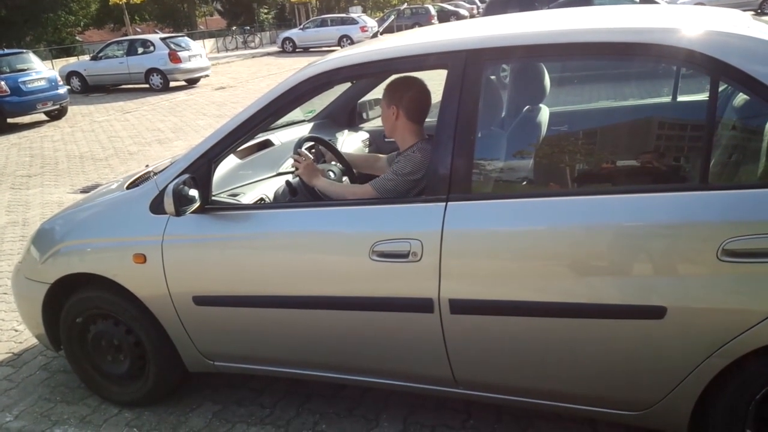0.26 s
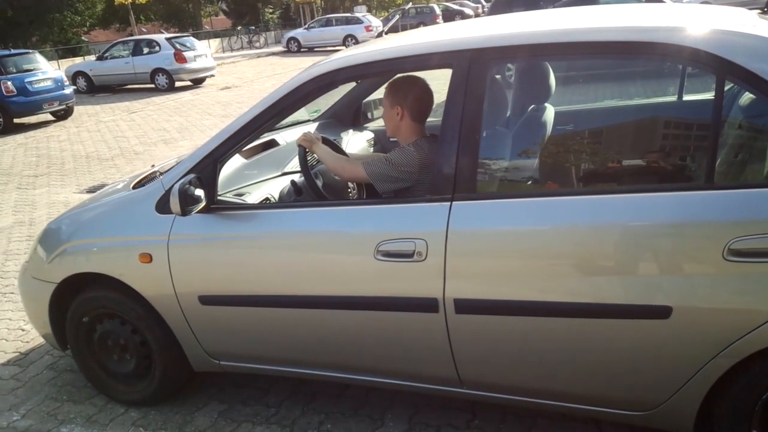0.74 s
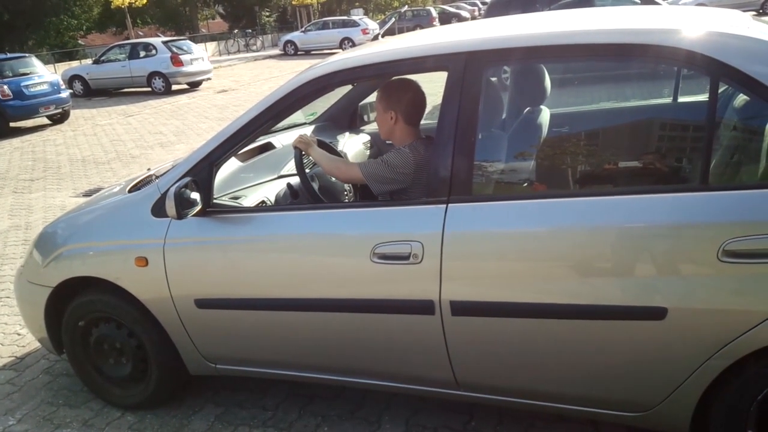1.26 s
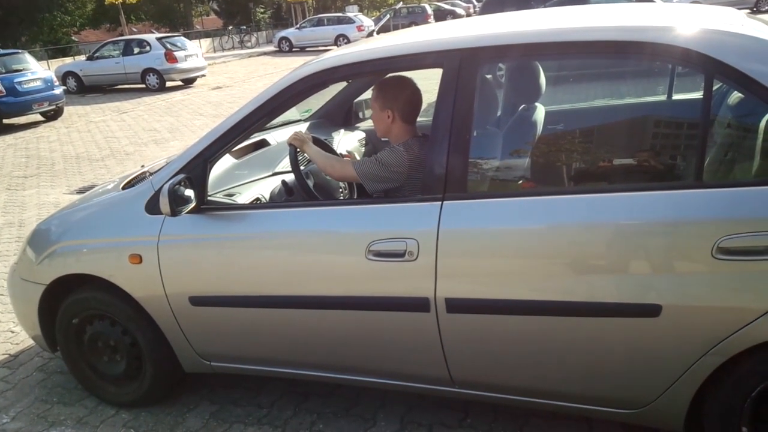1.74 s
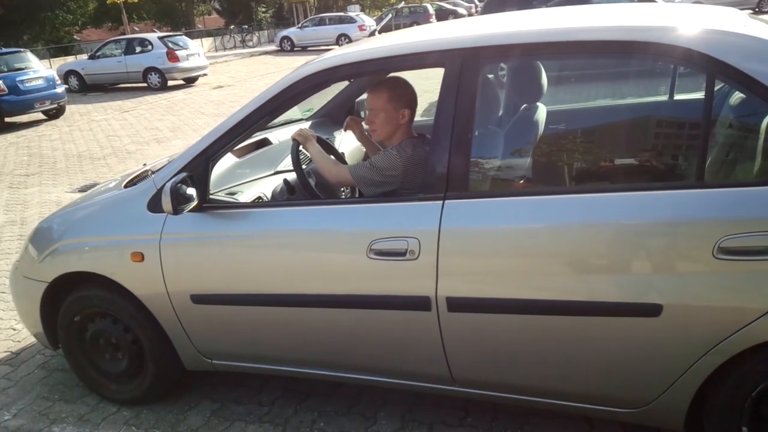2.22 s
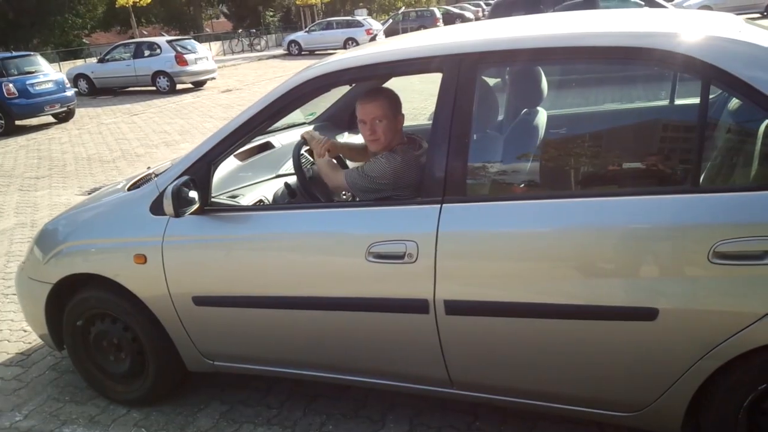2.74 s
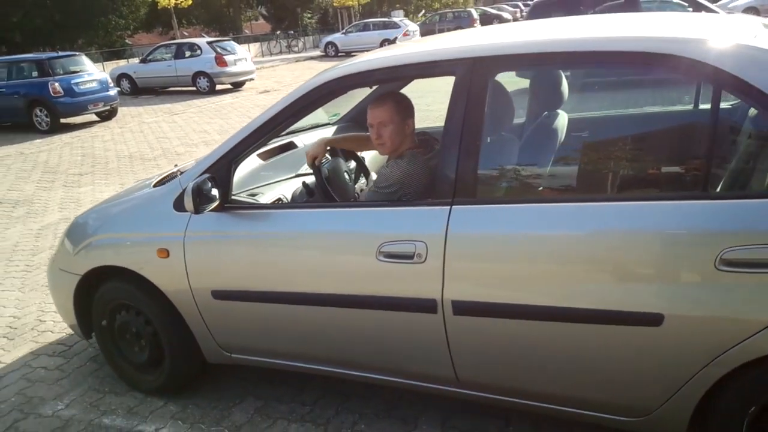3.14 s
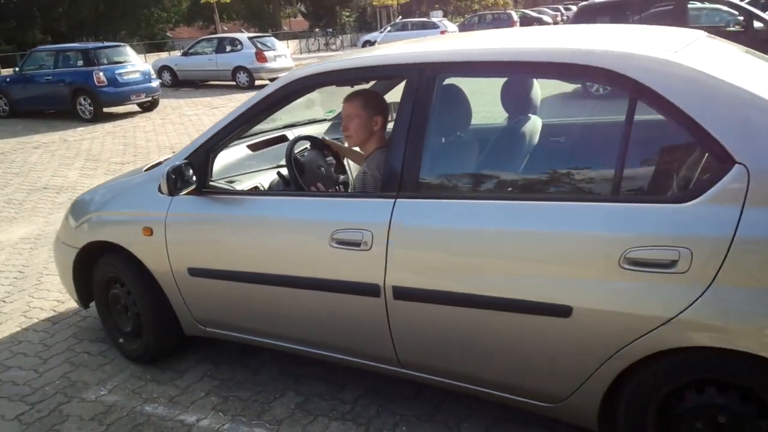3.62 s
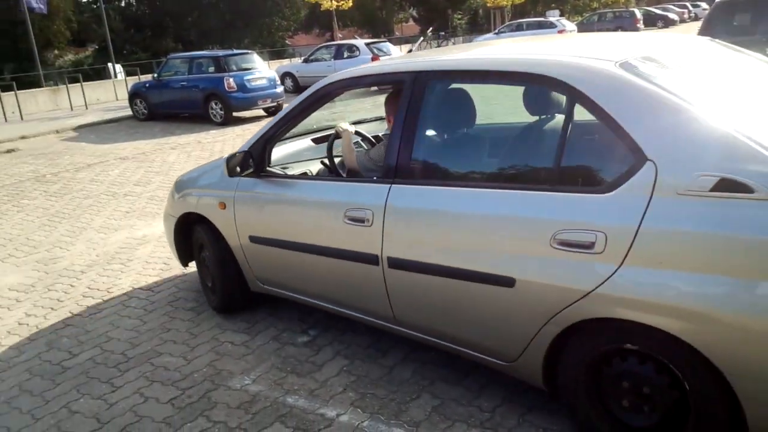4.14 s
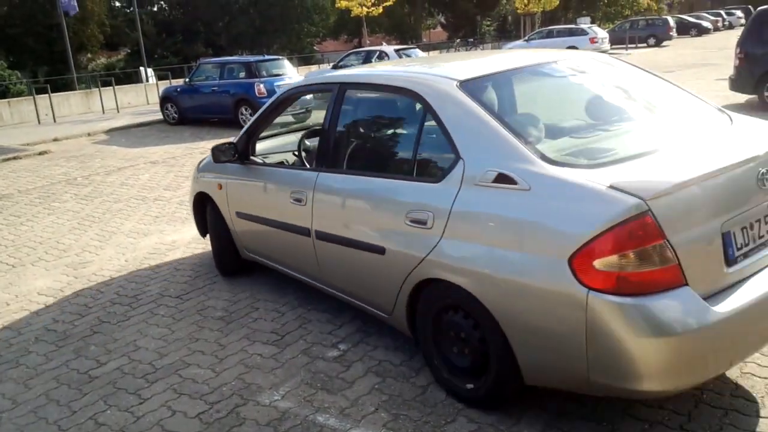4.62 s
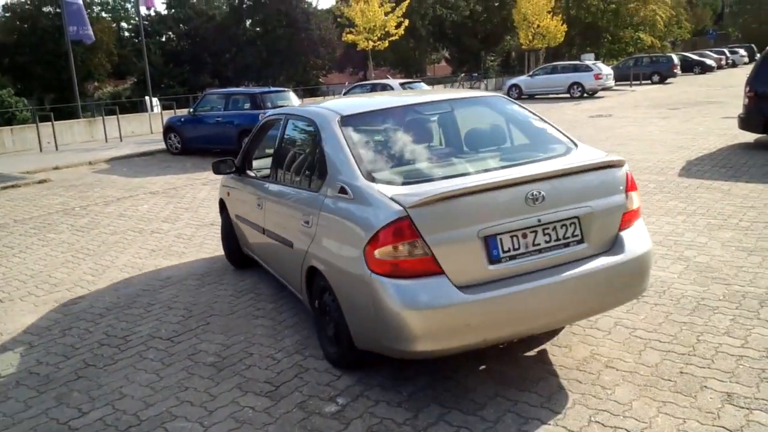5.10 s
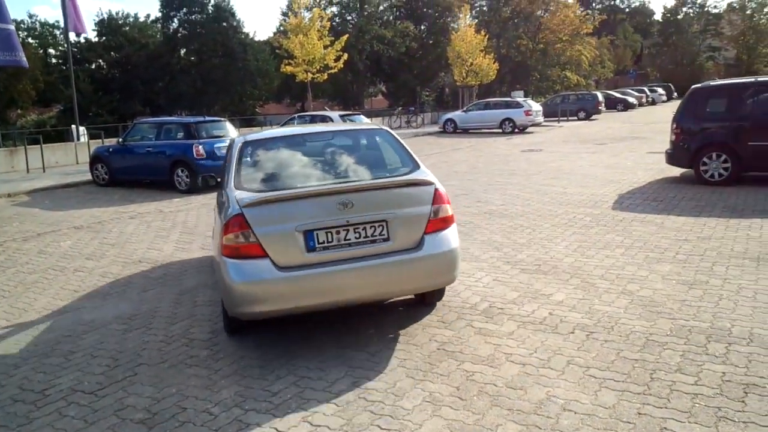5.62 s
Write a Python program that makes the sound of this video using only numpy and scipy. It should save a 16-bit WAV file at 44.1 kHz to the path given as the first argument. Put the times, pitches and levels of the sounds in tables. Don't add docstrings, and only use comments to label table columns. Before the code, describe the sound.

In an open paved car park, small scrapes come from a car's cabin, then a loud double lever clack with low thuds. A faint high whistle and soft ticks follow. The wheels start rolling: gritty hiss swells and sharp stone snaps multiply as the car swings away. Close small camera microphone, slight breeze rumble.

```python
import sys
import numpy as np
from scipy import signal
from scipy.fft import rfft, irfft, next_fast_len
from scipy.io import wavfile
from scipy.ndimage import uniform_filter1d

SR = 44100
rng = np.random.default_rng(int(sys.argv[2]) if len(sys.argv) > 2 else 0)


def volts_from_decibels(level):
    exponent = np.asarray(level, float) / 20
    return 10 ** exponent


def transcribe(signal):
    frames = np.atleast_2d(signal).T
    limited = np.clip(frames, -1, 1)
    pcm = np.round(limited * 32767).astype(np.int16)
    wavfile.write(sys.argv[1], SR, pcm)


N = 258426

# time in seconds, level in dB.
WIND = [(0, -45), (.1, -53), (.45, -48.5), (1.14, -44), (1.24, -34.5), (1.33, -47), (1.8, -46),
        (2.3, -50.5), (2.87, -51), (3.3, -48), (3.46, -43.5), (3.57, -46), (4.3, -41.5), (4.52, -40),
        (4.67, -40.5), (5.1, -39.5), (5.42, -39.5), (5.75, -42.5)]
# frequency in Hz, density in dB per Hz.
BREEZE_COLOUR = [(8, -22), (16, -7.5), (30, -3), (60, -6), (100, -11.5), (160, -21), (250, -33),
                 (400, -74.5)]
AIR_COLOUR = [(120, -23), (200, -4), (520, -6), (1190, -10.5), (2680, -20.5), (4140, -20), (6610, -15.5),
              (8510, -21.5), (13400, -23), (14100, -26), (14900, -53)]
AIR_DB = -52.5

# time in seconds, crunch in dB.
CONTACT = [(0.05, -64), (0.44, -53.5), (1.14, -61.5), (1.26, -50), (1.43, -66), (1.57, -49), (1.75, -54.5),
           (2.69, -54.5), (2.87, -47), (3.15, -38.5), (3.62, -39.5), (4.31, -33), (4.52, -32), (4.67, -33),
           (5.17, -31.5), (5.42, -31.5), (5.62, -34.5), (5.86, -31)]
# frequency in Hz, density in dB per Hz.
GRIT_COLOUR = [(1530, -38.5), (2600, -37.5), (2900, -20), (3720, -6), (4120, -5.5), (4500, -3),
               (5050, -3.5), (6430, 1), (6820, -0.5), (7500, -5.5), (9130, -14), (11000, -31), (13400, -24),
               (14300, -31), (14900, -47)]
TREAD_COLOUR = [(260, -32), (450, -22), (490, -17), (624, -5), (747, -2.5), (859, -2), (1070, -2),
                (1230, -4.5), (1770, -2.5), (2110, -6), (2900, -13.5), (3770, -29), (6380, -120)]
DRONE_COLOUR = [(71, -28.5), (120, 0.5), (209, -2), (290, 0.5), (316, -1.5), (462, -15), (560, -24.5),
                (730, -40), (1230, -120)]
# frequency in Hz, width in Hz, level in dB.
HOLLOWS = [(984, 42, -14), (1550, 60, -12.5), (1940, 70, -18), (4460, 130, -6.5), (5300, 140, -1),
           (5900, 140, -0.5), (6330, 130, 0.5), (6650, 100, -0.5), (7000, 130, -6), (7800, 150, -10)]
HOLLOWS_DB, HOLLOW_HITS_PER_S = -7.5, 35
# dB at full roll, dB per dB of crunch, resting dB, shudder share in dB.
TREAD_LAW, DRONE_LAW = (-44, 1.5, -65, -8.5), (-47, 0.77, -59.5, -3.5)
FULL_ROLL_DB = -33
# time in seconds, level in dB, length in seconds.
SHUDDERS = [
    (1.242, -41.5, 0.059),
    (1.585, -46, .06),
    (1.72, -58, 0.053),
    (2.34, -57, 0.47),
]
# time in seconds, change in dB.
TAIL_SWING = [(0, 0.5), (2.3, -1), (2.6, -4), (3.3, -2), (3.8, 1), (4.5, 1.5), (5.3, 1), (5.86, 1)]
TURN_S = 3.7
ROLLS_S = 2.5

# start in seconds, peak in dB, panel share in dB,
# panel frequency in Hz, rise in ms.
CABIN = [(.19, -30, -12, 1780, 2.6), (.246, -34, -13.5, 1500, 3.3), (.699, -33, -29, 1500, 3.5),
         (.712, -31, -16, 1500, 3), (1.181, -13, -35, 2150, 5), (1.188, -7, -21, 2150, 0.95),
         (1.1944, -4, -23.5, 2150, 0.86), (1.203, -19, -18, 2150, 1.9), (1.234, -24.5, -29, 1400, 1.8),
         (1.259, -27, -23, 2100, 4), (1.266, -21, -25, 2100, 1), (1.275, -21.5, -19, 2100, 2.7),
         (1.379, -29, -20, 2170, 4), (1.3854, -20.5, -16, 2170, 0.9), (1.392, -21, -13.5, 2160, 2.2),
         (1.448, -40, -9, 2150, 4.4), (1.54, -31.5, -3, 732, 10), (1.545, -44, 13.5, 1620, 3.7),
         (1.593, -29.5, -2.5, 810, 4.9), (1.634, -36, 0, 2620, 3.7), (1.714, -40.5, -7, 1500, 4)]
CABIN_FALL_MS, CABIN_FALL_PER_RISE = 6.2, 0.42
# start in seconds, peak in dB.
TICKS = [
    (2.289, -37.5),
    (2.342, -40),
    (2.396, -39.5),
    (2.43, -47),
    (2.468, -44),
    (2.511, -47),
]
TICK_SHAPE = (-9, 2500, 2.5, 11)
TICK_RING = (-43.5, 6335, .035)
# start in seconds, peak in dB, panel share in dB,
# panel frequency in Hz, fall in ms.
SCUFFS = [(2.632, -41.5, -7, 1400, 20), (2.825, -44, 1.5, 1820, 46), (2.94, -38, -4, 1770, 14),
          (2.999, -26.5, -15, 1500, 7.7), (3.072, -24, -10, 2240, 16.5), (3.12, -24, -9, 1200, 6.2),
          (3.208, -22, -3.5, 1690, 11.6), (3.225, -43.5, 8, 740, 33), (3.346, -23.5, -16, 1490, 17),
          (3.404, -18, -10.5, 1290, 7.4), (3.848, -25.5, -12, 2000, 9.8), (4.161, -23, -18, 1800, 7.7),
          (4.264, -25, -7.5, 1800, 8.7), (4.389, -25, -12, 1800, 6.4), (4.503, -18.5, -10, 1700, 10),
          (4.793, -19.5, -9, 1800, 7), (4.886, -23.5, -10, 1800, 8), (5.144, -31, -22, 1800, 6.5),
          (5.2, -26, -22, 1800, 6.2), (5.683, -27.5, -2, 1780, 12), (5.751, -24.5, -8, 1800, 8.3)]
SCUFF_RISE_PER_FALL = 0.16
# frequency in Hz, density in dB per Hz.
LEVER_COLOUR = [(1530, -51), (2600, -33), (2970, -27.5), (3800, -18), (4630, -17.5), (6430, -4.5),
                (8060, -14.5), (11200, -35), (13400, -32), (14900, -42)]
LEVER_FROM_S, LEVER_TO_S = 1.1, 1.43
# frequency in Hz, width in Hz, level in dB.
TRIM = [(732, 150, -8.5), (1400, 340, -4), (2150, 110, -30)]
# start in seconds, peak in dB, frequency in Hz,
# 60 dB decay in seconds.
PINGS = [(1.636, -36, 9000, .03), (1.637, -42, 8250, .02), (1.7665, -43, 5300, 0.03),
         (2.0652, -27.5, 4850, 0.015), (2.0652, -40, 2090, 0.021), (2.045, -41, 5100, .02),
         (1.552, -48, 1950, 0.11), (2.634, -42.5, 5800, 0.081), (3.1, -39, 3600, .025),
         (2.853, -42, 2600, .012), (2.798, -40.5, 3960, .012), (3.9, -42, 4100, .014),
         (2.633, -42, 6300, .05), (1.189, -26.5, 13200, .018), (1.197, -33, 14000, .018),
         (1.386, -35, 13300, .02), (1.387, -42, 12000, .02), (1.19, -33, 9800, .04),
         (1.191, -43, 8328, .045), (1.267, -35, 8800, 0.044), (1.225, -37, 340, 0.054),
         (1.19, -38, 2130, 0.072), (1.245, -48, 2170, .12), (1.545, -42, 2150, .08),
         (1.59, -42, 800, 0.062), (3.1, -53, 1950, .12), (1.39, -36, 2170, 0.074), (1.43, -58, 2180, 0.45),
         (2.73, -58, 1850, 0.23), (2.885, -49, 1500, 0.065), (2.945, -49, 1900, .1),
         (3.852, -33, 4100, 0.022), (5.036, -30, 1070, 0.014), (1.553, -31.5, 740, 0.081),
         (1.39, -45.5, 760, .06), (3.209, -20.5, 2020, 0.0072)]
# start in seconds, peak in dB, frequency in Hz,
# 60 dB decay in seconds.
KNOCKS = [
    (1.188, -33.5, 119, 0.15),
    (1.193, -35, 334, 0.052),
    (1.228, -30, 45, 0.074),
    (1.287, -44, 235, 0.09),
    (1.391, -32.5, 105, 0.12),
    (1.403, -34.5, 203, 0.051),
    (1.43, -27.5, 40, .1),
    (1.51, -32, 40, 0.088),
    (1.686, -28, 55, 0.14),
    (1.716, -38, 79.6, 0.14),
]

# time in seconds, level in dB.
IDLE_TONE = [(1.66, -90), (1.68, -54), (2.27, -54.5), (2.36, -59), (2.44, -63), (2.52, -57), (2.64, -53.5),
             (2.72, -57.5), (2.83, -57), (2.845, -66), (2.88, -57.5), (2.93, -59), (2.955, -66),
             (2.98, -57), (3.05, -61), (3.16, -60), (3.46, -58), (3.55, -90)]
# start in seconds, end in seconds, level in dB, sag in dB per second.
DRIVE_PUSHES = [
    (3.172, 3.215, -45, 10),
    (3.247, 3.305, -45, 30),
    (3.32, 3.385, -46, 10),
    (3.4, 3.445, -50, 40),
]
DRIVE_EDGE_S = .012
# frequency in Hz, level in dB.
CHORD = [(4998, 0), (7490, -7)]
# frequency in Hz, level in dB, start in seconds, end in seconds.
FAINT_TONES = [
    (9997, -72, 3.15, 4.03),
    (13798, -83, 0, 5.86),
    (12496, -66, 3.172, 3.195),
    (12496, -60, 3.195, 3.265),
    (12496, -60, 3.282, 3.385),
    (12496, -63, 3.385, 3.442),
    (13798, -70, 3.272, 3.322),
]

# start in seconds, peak in dB,
# low share in dB, ring frequency in Hz.
SNAPS_NEAR = [(1.7665, -36, 0, 5300), (1.8735, -37, -30, 6090), (2.0447, -26, -48, 6750),
              (2.065, -22, -16, 5600), (2.0854, -17.5, -45, 8000), (3.0037, -31, -7, 5740),
              (3.015, -30, -30, 6820), (3.0228, -24, -32, 6840), (3.0735, -22, -4, 6630),
              (3.0864, -16, -31, 7060), (3.101, -14, -31, 6860), (3.1088, -14, -33, 6940),
              (3.121, -11, -16, 7100), (3.1244, -19, -20, 6300), (3.1913, -22, -8, 4450),
              (3.3488, -16, -33, 4740), (3.3636, -14, -19, 5350), (3.4058, -9, -12, 5300),
              (3.412, -20, -20, 6340), (3.4221, -19, -23, 5780), (3.4641, -26, -50, 4800),
              (3.5188, -18.5, -23, 6850), (3.599, -16, -28, 5300), (3.6518, -17, -48, 6990),
              (3.6593, -19.5, -32, 5760)]
# start in seconds, peak in dB, low share in dB,
# ring frequency in Hz.
SNAPS_AWAY = [(3.99, -17, -29.5, 6480), (4.023, -17, -32, 4570), (4.1617, -10, -28, 5360),
              (4.165, -12, -32, 5030), (4.2559, -18, -21, 6700), (4.3923, -12, -23, 6750),
              (4.4267, -16, -28, 6550), (4.4301, -18, -23, 6080), (4.468, -17, -19, 5930),
              (4.4796, -14, -23, 5830), (4.509, -15, -9, 5460), (4.607, -17, -25, 6080),
              (4.6192, -15, -30, 6370), (4.7928, -7.5, -13.5, 6760), (4.821, -17, -36, 6200),
              (5.08, -15, -15, 6000), (5.1278, -17.5, -1, 5770), (5.1501, -2, -45, 6330),
              (5.153, -2.5, -37, 6330), (5.203, -15, -29, 6250), (5.2052, -14, -31, 5700),
              (5.218, -15, -21, 6050), (5.2324, -14, -30, 6050), (5.3022, -5, -37, 5900),
              (5.3174, -14, -15, 5200), (5.402, -16, -30, 6000), (5.406, -7.5, -36, 5800),
              (5.4785, -12, -24, 5460), (5.4887, -15, -31, 5900), (5.492, -13, -31, 6500),
              (5.7504, -9.5, -12, 4720)]
# start in seconds, peak in dB, ring frequency in Hz.
CRACKS = [(2.7587, -35, 6400), (2.7986, -34, 6600), (2.819, -32, 6800), (2.853, -37, 6480),
          (2.872, -35, 6800), (2.9418, -34, 6640), (2.965, -31, 6800), (3.042, -27, 6000),
          (3.6938, -29, 6880), (3.7741, -28, 6550), (3.8838, -30, 6390), (3.8963, -23, 6440),
          (3.9452, -23, 7210), (4.1028, -25, 6590), (4.1223, -24, 6350), (4.2415, -21, 6620),
          (4.2655, -20, 6910), (4.3338, -19, 4200), (4.3707, -21, 6820), (4.3955, -14, 6800),
          (4.3985, -15, 6900), (4.5118, -22, 6300), (4.532, -20, 6300), (4.5718, -17, 5590),
          (4.7584, -25, 6740), (4.8851, -20, 6320), (5.0542, -18, 6290), (5.238, -19, 6200),
          (5.255, -21, 6500), (5.3625, -20, 6280), (5.502, -12.5, 4700), (5.5371, -18, 5330),
          (5.565, -16.5, 6220), (5.6867, -21, 4370), (5.757, -19, 5500)]
# start in seconds, peak in dB.
SPLITS = [(2.065, -36), (2.0854, -34), (3.101, -36), (3.1088, -34), (3.122, -35), (3.3636, -30),
          (3.4058, -26), (3.5188, -36), (3.6518, -32), (3.6593, -37), (4.509, -30), (4.7928, -32),
          (4.8851, -35), (5.1501, -31), (5.3021, -20.5), (5.3174, -36)]
# start in seconds, end in seconds, pops per second.
POPS = [
    (3.0, 3.2, 20),
    (3.2, 5.84, 20),
]
POP_OVER_CRUNCH_DB, POP_SPREAD_DB, POP_LOW_DB = 5.5, 5, -23
POP_HZ, POP_SPREAD_HZ = 6000, 900

TOP_HZ = 13980
OFFSET = -.0939


def level(x, db=0):
    return x * volts_from_decibels(db) / np.sqrt(np.mean(x ** 2))


def colour(x, spectrum, size=4096):
    hz, db = np.transpose(spectrum)
    f = np.maximum(np.arange(size // 2 + 1) * SR / size, 1)
    cepstrum = irfft(np.interp(np.log(f), np.log(hz), db) * np.log(10) / 20)
    cepstrum[1:size // 2] *= 2
    cepstrum[size // 2 + 1:] = 0
    return signal.fftconvolve(x, irfft(np.exp(rfft(cepstrum))))[:len(x)]


def band(x, hz, width_hz):
    return signal.lfilter(*signal.iirpeak(hz, hz / width_hz, SR), x)


def walk(rate):
    hold = int(SR / rate)
    steps = np.repeat(rng.standard_normal(N // hold + 1), hold)
    return 1.61 * uniform_filter1d(uniform_filter1d(steps, hold), hold)[:N]


def curves(table):
    s, *columns = np.transpose(table)
    return [np.interp(np.arange(N) / SR, s, column) for column in columns]


def add(track, x, s, db):
    i = int(s * SR)
    x = x[:N - i]
    track[i:i + len(x)] += x * volts_from_decibels(db) / np.max(np.abs(x))


def dying(starts, tail_ms):
    return signal.lfilter([1], [1, -np.exp(-1000 / (tail_ms * SR))], starts)


def spits(per_s, tail_ms):
    starts = (rng.random(N) < per_s / SR) * rng.exponential(size=N)
    return level(uniform_filter1d(dying(starts, tail_ms), size=16))


def flickering(spectrum, source, flicker_db, rate, spit=0.):
    size = next_fast_len(N, True)
    whole = rfft(colour(source, spectrum), size)
    octave = np.log2(np.arange(size // 2 + 1) * SR / size + 1)
    lowest, highest = np.log2(spectrum[0][0]), np.log2(spectrum[-1][0]) + .5
    out = 0
    for centre in np.arange(3, 14.3, 1 / 3):
        if not lowest < centre < highest:
            continue
        gain = volts_from_decibels(flicker_db * walk(rate))
        if spit:
            gain = gain * (1 + spit * spits(220, 3.4))
        part = whole * np.clip(1 - 3 * abs(octave - centre), 0, 1)
        out = out + gain * irfft(part, size)[:N]
    return level(out)


def breeze():
    (wind_db,) = curves(WIND)
    rumble = flickering(BREEZE_COLOUR, rng.standard_normal(N), 1.9, 9)
    return (volts_from_decibels(wind_db - 2.0) + volts_from_decibels(-51.5)) * rumble


def open_air():
    return level(colour(rng.standard_normal(N), AIR_COLOUR), AIR_DB - 3)


def grains(per_s, spread_db, tail_ms):
    sizes = np.minimum(rng.exponential(size=N), 3)
    starts = (rng.random(N) < per_s / SR) * volts_from_decibels(spread_db * sizes)
    return level(dying(starts, tail_ms) * rng.standard_normal(N))


def hollows():
    out = 0
    for hz, width_hz, db in HOLLOWS:
        sizes = np.minimum(rng.exponential(size=N), 3)
        hits = (rng.random(N) < HOLLOW_HITS_PER_S / SR) * sizes
        out = out + level(band(hits, hz, width_hz), db)
    return level(out, HOLLOWS_DB)


def follows(grit_db, law):
    full_db, slope, rest_db, shudder_db = law
    t = np.arange(N) / SR
    shake = sum(volts_from_decibels(db + shudder_db) * np.exp(-((t - s) / length) ** 2) for s, db, length in SHUDDERS)
    driven = volts_from_decibels(full_db + slope * (grit_db - FULL_ROLL_DB))
    return 20 * np.log10(driven + volts_from_decibels(rest_db) + shake)


def tyres(grit_db, tread_db, drone_db):
    t = np.arange(N) / SR
    crush = grains(900, 2.8, 0.66) + grains(150, 2.4, 4.1)
    swell = volts_from_decibels(0.46 * walk(12))
    grit = flickering(GRIT_COLOUR, crush + volts_from_decibels(8.5) * rng.standard_normal(N), 1.62, 25, spit=0.61)
    tread = flickering(TREAD_COLOUR, volts_from_decibels(-1.5) * crush + rng.standard_normal(N), 1.2, 18, spit=0.31)
    side_on = np.clip((TURN_S + 0.88 - t) / 0.37, 0, 1)
    hiss = band(band(rng.standard_normal(N), 2060, 1050), 3240, 1600)
    tread = tread + side_on * level(hiss, -7)
    near = np.clip((TURN_S + .15 - t) / 0.42, 0, 1)
    bright = band(band(crush + 2.2 * rng.standard_normal(N), 8200, 2200), 8200, 3000)
    grit = grit + near * level(bright, -12)
    hum = band(band(rng.standard_normal(N), 1710, 270), 1680, 530)
    tread = tread + (1 - side_on) * volts_from_decibels(2.3 * walk(13)) * level(hum, -8.0)
    drone = flickering(DRONE_COLOUR, rng.standard_normal(N), 1.3, 12)
    ground = volts_from_decibels(grit_db - 2.5) * (grit + hollows()) + volts_from_decibels(tread_db - 1.3) * tread
    return swell * ground + volts_from_decibels(drone_db - 1.63) * drone


def scrapes():
    cabin = [(*row, CABIN_FALL_MS + CABIN_FALL_PER_RISE * row[-1]) for row in CABIN]
    ticks = [(*row, *TICK_SHAPE) for row in TICKS]
    scuffs = [(*row[:-1], SCUFF_RISE_PER_FALL * row[-1], row[-1]) for row in SCUFFS]
    return cabin + ticks + scuffs


def friction():
    out, t = np.zeros(N), np.arange(6000) / SR
    for s, db, panel_db, panel_hz, rise_ms, fall_ms in scrapes():
        rub, slip = rng.standard_normal((2, len(t)))
        rise = (1 - np.exp(-1000 * t / rise_ms)) ** 2
        fall = np.exp(-1000 * t / fall_ms) + volts_from_decibels(-24.0) * np.exp(-t / 0.038)
        stick_slip = volts_from_decibels(0.58 * level(uniform_filter1d(slip, 40)))
        push = rub * rise * fall * stick_slip
        spectrum = LEVER_COLOUR if LEVER_FROM_S < s < LEVER_TO_S else GRIT_COLOUR
        add(out, colour(push, spectrum), s, db)
        trim = sum(volts_from_decibels(share_db) * level(band(push, hz, width)) for hz, width, share_db in TRIM)
        panel = level(band(push, panel_hz, 0.25 * panel_hz), 4.8)
        add(out, trim + panel, s, db + panel_db)
    return out


def ringing_parts():
    out, t = np.zeros(N), np.arange(6000) / SR
    tick_rings = [(row[0] + 0.001014, *TICK_RING) for row in TICKS]
    for s, db, hz, t60 in list(PINGS) + list(KNOCKS) + tick_rings:
        swell = 1 - np.exp(-t * 56 / t60)
        decay = np.exp(-np.log(1000) * t / t60)
        add(out, swell * decay * np.sin(2 * np.pi * hz * t), s, db)
    return out


def inverter():
    (idle_db,), t = curves(IDLE_TONE), np.arange(N) / SR
    drive = 0
    for on, off, db, sag in DRIVE_PUSHES:
        gate = np.clip(np.minimum(t - on, off - t) / DRIVE_EDGE_S + .5, 0, 1)
        drive = drive + volts_from_decibels(db - sag * np.abs(t - on)) * gate
    out = volts_from_decibels(idle_db + 1.3 * walk(25)) * np.sin(2 * np.pi * 5000.5 * t)
    for hz, db in CHORD:
        wander_hz = hz + 6.7 * walk(27.8)
        out += drive * volts_from_decibels(db + 1.5 * walk(34.9)) * np.sin(2 * np.pi * np.cumsum(wander_hz) / SR)
    for hz, db, start, end in FAINT_TONES:
        sounding = (t > start) & (t < end)
        out += volts_from_decibels(db + 2 * walk(10)) * sounding * np.sin(2 * np.pi * hz * t)
    return np.sqrt(2) * out


def stones(snaps):
    out, t = np.zeros(N), np.arange(900) / SR
    for s, db, low_db, hz in snaps:
        crack, spray = rng.standard_normal((2, len(t)))
        spray_db = -17 if s > TURN_S else -27
        push = 2 * (t == 0) + .6 * crack * np.exp(-t / .0003) + volts_from_decibels(spray_db) * spray * np.exp(-t / .003)
        ring = band(push, hz, 900)
        ring = colour(ring, GRIT_COLOUR, size=512) if s > ROLLS_S else band(ring, hz, 2500)
        body = level(ring) + level(colour(push, GRIT_COLOUR, size=512), -6)
        add(out, body, s - .0004, db - 1.5)
        add(out, band(band(push, 13300, 1500), 13300, 2500), s - .0004, db - 31)
        add(out, band(band(push, 11000, 3000), 12400, 4400), s - .0004, db - 30)
        add(out, band(band(push, 1700, 890), 1600, 2700), s - .0003, db + low_db - 5.0)
    return out


def splits():
    out, t = np.zeros(N), np.arange(400) / SR
    for s, db in SPLITS:
        push = rng.standard_normal(len(t)) * np.exp(-t / .0008)
        upper = band(band(push, 13400, 2500), 11400, 4000)
        lower = band(band(push, 9300, 2500), 9000, 4000)
        add(out, upper + volts_from_decibels(3) * lower, s - .0003, db)
    return out


def pops(grit_db):
    rows = []
    for start, end, per_s in POPS:
        count = int((end - start) * per_s)
        place, size, low, pitch = rng.standard_normal((count, 4)).T
        s = start + (end - start) * (np.arange(count) + .5 + np.tanh(place) / 2) / count
        db = grit_db[(s * SR).astype(int)] + POP_OVER_CRUNCH_DB + POP_SPREAD_DB * np.minimum(size, 1)
        hz = np.clip(POP_HZ + POP_SPREAD_HZ * pitch, 4000, 8000)
        rows += zip(s, db, POP_LOW_DB + 7 * low, hz)
    return rows


def scene():
    (grit_db,), (tail_db,) = curves(CONTACT), curves(TAIL_SWING)
    rolling = tyres(grit_db, follows(grit_db, TREAD_LAW), follows(grit_db, DRONE_LAW) + tail_db)
    cracks = [(s, db, POP_LOW_DB, hz) for s, db, hz in CRACKS]
    snaps = list(SNAPS_NEAR) + list(SNAPS_AWAY) + cracks + pops(grit_db)
    car = rolling + friction() + ringing_parts() + inverter() + stones(snaps) + splits()
    return (car + breeze() + open_air())[None]


def top_cut(x):
    return signal.sosfilt(signal.butter(12, 15040, fs=SR, output="sos"), x)


def record(dry):
    low_pass = signal.ellip(9, .5, 38, TOP_HZ, fs=SR, output="sos")
    mix = signal.sosfilt(low_pass, dry) + OFFSET
    return top_cut(mix)


dry = scene()
out = record(dry)
transcribe(out)
```